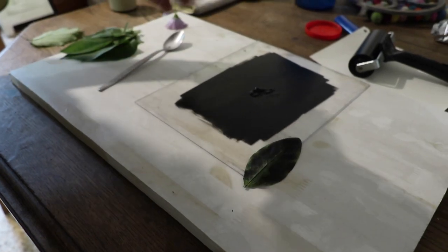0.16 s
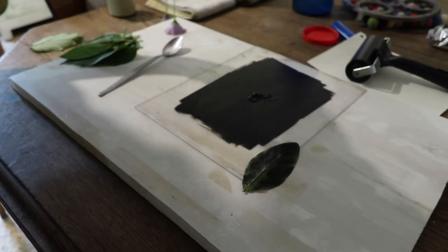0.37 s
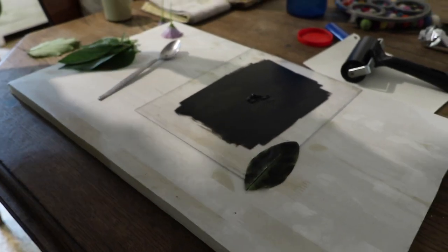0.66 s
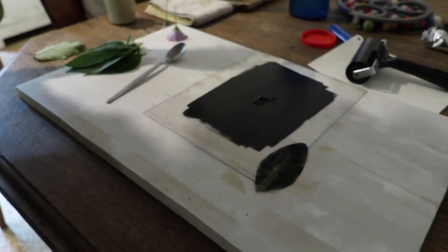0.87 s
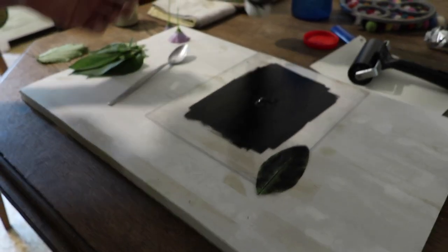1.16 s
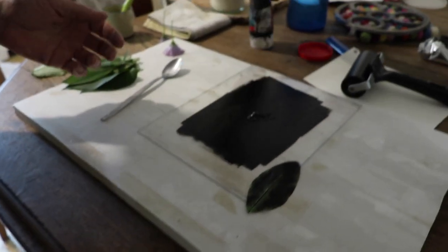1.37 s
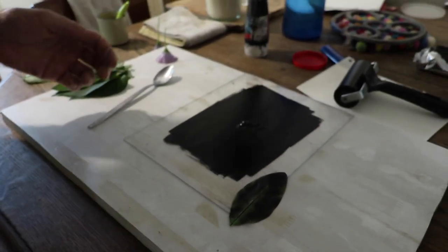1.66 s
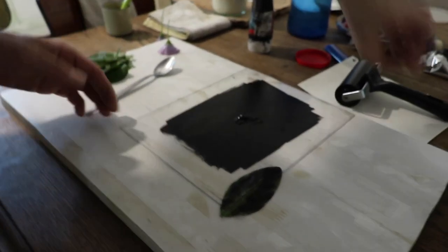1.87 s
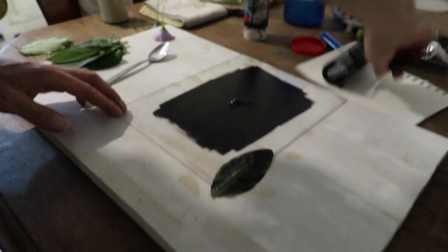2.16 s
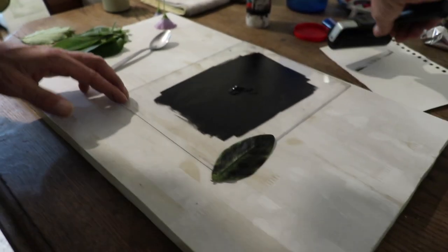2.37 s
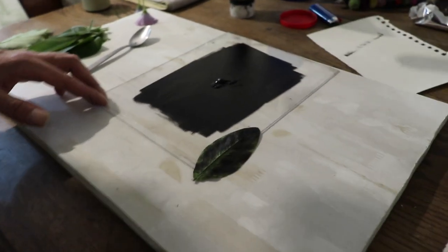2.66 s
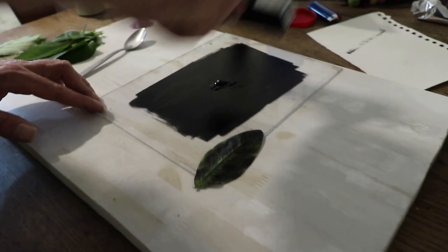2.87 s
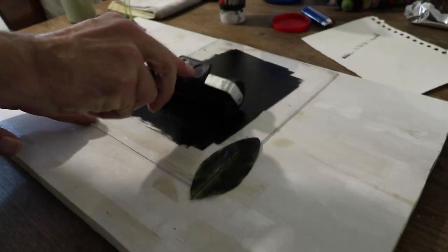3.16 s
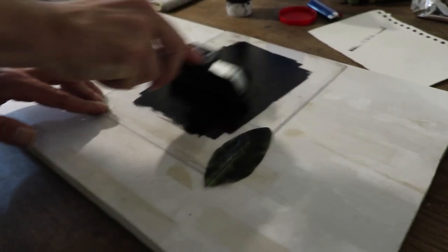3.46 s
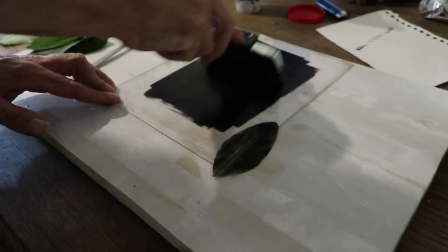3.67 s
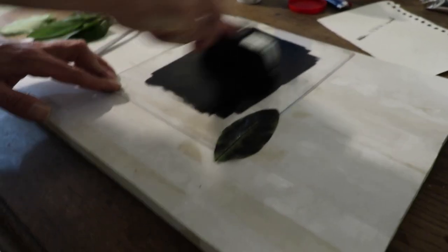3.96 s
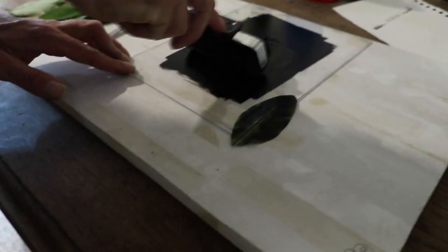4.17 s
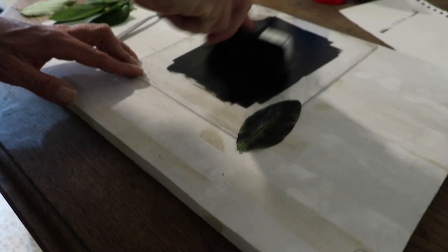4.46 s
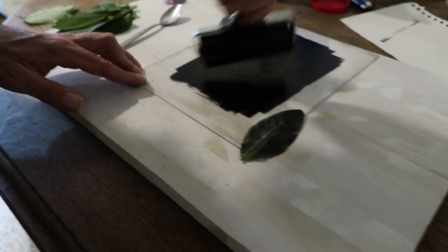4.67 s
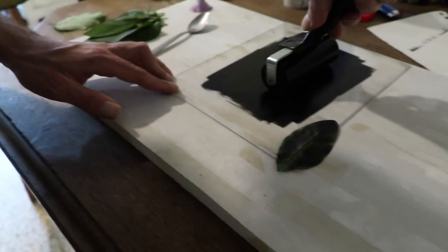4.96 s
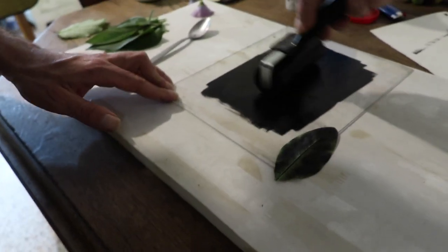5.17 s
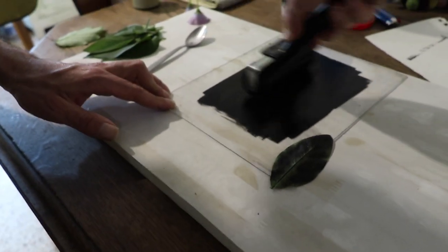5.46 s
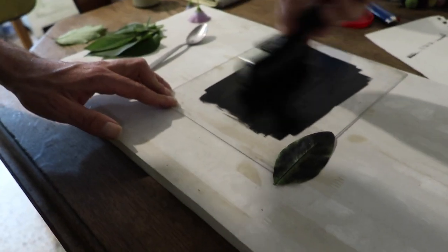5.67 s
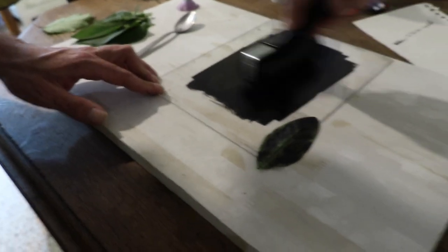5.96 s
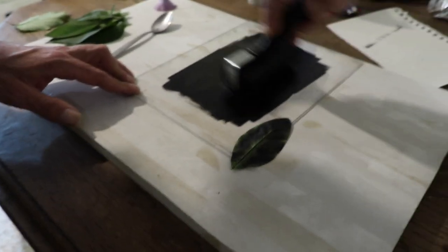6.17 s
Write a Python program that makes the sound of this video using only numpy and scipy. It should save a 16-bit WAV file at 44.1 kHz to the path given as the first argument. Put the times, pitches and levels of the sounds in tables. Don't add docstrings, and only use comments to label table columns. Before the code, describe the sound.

Soft brushing, a spoon clink and a loud knock lead into tacky roller strokes, a clattering set-down on wood, and more sticky rolling.

```python
import sys
import numpy as np
from scipy import signal
from scipy.fft import rfft, irfft, next_fast_len
from scipy.io import wavfile
from scipy.ndimage import uniform_filter1d, map_coordinates

SR = 44100
rng = np.random.default_rng(int(sys.argv[2]) if len(sys.argv) > 2 else 0)


def magnitude_from_level(level_db):
    exponent = np.asarray(level_db, float) / 20
    return 10 ** exponent


def int16_out(signal):
    q = np.round(np.clip(np.atleast_2d(signal).T, -1, 1) * 32767)
    wavfile.write(sys.argv[1], SR, q.astype(np.int16))


N = 279153
T = np.arange(N) / SR


def unit(x):
    return x / np.sqrt(np.mean(x ** 2) + 1e-20)


def along(points, hz):
    f, v = np.transpose(points)
    return np.interp(np.log(hz + 1), np.log(f + 1), v)


def curves(rows):
    s, *cols = np.transpose(rows)
    return [np.interp(T, s, c) for c in cols]


def wobble(rate):
    return map_coordinates(rng.standard_normal(int(N * rate / SR) + 4), [T * rate])


def filtered(x, response):
    m = next_fast_len(N + SR)
    return irfft(rfft(x, m) * response(np.fft.rfftfreq(m, 1 / SR)), m)[..., :N]


def peak(f, hz, width):
    return 1j * f * width / (hz * hz - f * f + 1j * f * width)


def body(modes, damping):
    def response(f):
        total = 0
        for k, (hz, db, t60) in enumerate(modes):
            width = np.log(1000) / np.pi / (damping * t60)
            total = total + (-1) ** k * magnitude_from_level(db) * peak(f, hz, width) * SR / (np.pi * width)
        return total
    return response


def spread(pair, wide):
    mid, side = pair[0], filtered(pair[1], lambda f: 1j * magnitude_from_level(along(wide, f)))
    return np.array([mid + side, mid - side])


def crackle(rate, scatter_db, share):
    hit = rng.random((2, N)) < rate / SR
    size = magnitude_from_level(scatter_db * rng.standard_normal((2, N)))
    grains = hit * size * rng.choice([-1, 1], (2, N))
    return np.sqrt(share) * unit(grains) + np.sqrt(1 - share) * rng.standard_normal((2, N))


def patchy(x):
    z = signal.stft(x, nperseg=256)[2]
    field = uniform_filter1d(rng.standard_normal(z.shape[1:]), size=9, axis=0)
    field = uniform_filter1d(field, size=6, axis=1)
    return unit(signal.istft(z * magnitude_from_level(2.5 * unit(field)), nperseg=256)[1][:, :N])


def strokes(start, length, db, rise, sag, fall):
    u = T[::64] - np.reshape(start, (-1, 1))
    over = np.clip(u - np.reshape(length, (-1, 1)), 0, None)
    fade_db = np.reshape(db, (-1, 1)) - sag * np.clip(u, 0, None) - fall * over
    gain = np.clip(u / rise, 0, 1) * magnitude_from_level(fade_db)
    return np.interp(T, T[::64], np.linalg.norm(gain, axis=0))


def swells(middle, length, db):
    u = 2 * (T[::64] - middle[:, None]) / length[:, None]
    return np.interp(T, T[::64], np.linalg.norm(magnitude_from_level(db[:, None] - 11 * u ** 2), axis=0))


# [f/Hz, level/dB per Hz]
RUB_COLOUR = [(260, 3), (450, 2), (910, 0.5), (1330, -2.5), (1560, -4), (1940, -29.5), (3500, -23),
              (4550, -12.5), (7700, -120)]
# [f/Hz, level/dB per Hz]
TACK_COLOUR = [(1060, -24.5), (1800, 1), (1930, 1), (2560, -0.5), (5840, -5.5), (7500, -10), (9750, -17.5),
               (16500, -120)]
# [f/Hz, level/dB per Hz]
FIZZ_COLOUR = [(3530, -11.5), (6000, -2.5), (13100, -6.5), (15600, -12), (16000, -35.5), (16300, -79.5)]
# [start t/s, length t/s, tack level/dB, shine over tack level/dB, weight level/dB]
PASSES = [(3.267, 0.076, -59, 8, -53), (3.472, 0.033, -50.5, 9, -42), (3.533, 0.077, -49.5, 3, -42.5),
          (3.632, 0.095, -49.5, 7.5, -35.5), (3.82, 0.07, -51, 1, -40.5), (3.87, 0.064, -55.5, 10, -35),
          (3.969, 0.069, -52, 9.5, -39), (4.034, 0.047, -47.5, 4, -35), (4.107, 0.036, -47.5, -6, -45),
          (4.142, 0.044, -48.5, 4, -36), (4.186, 0.064, -48.5, 0, -37), (4.297, 0.052, -50.5, 8.5, -37),
          (4.353, 0.064, -46.5, 2.5, -38), (4.449, 0.14, -48, 0.5, -47), (4.621, 0.038, -47.5, -5, -50),
          (5.368, 0.053, -52, 2, -45), (5.43, 0.069, -55, 4.5, -46), (5.549, 0.099, -53, 8, -40.5),
          (5.68, 0.048, -49, 8.5, -36), (5.745, 0.032, -51, 14.5, -34), (5.843, 0.081, -54, 9, -41.5),
          (5.941, 0.07, -54, 3, -42.5), (6.032, 0.088, -49.5, 6.5, -33.5), (6.176, 0.088, -53, 1.5, -42),
          (6.242, 0.081, -48, 3.5, -41)]
# [middle t/s, length t/s, rub level/dB, rustle level/dB, weight level/dB]
BRUSHES = [(0.064, 0.35, -56.5, -51, -71), (0.32, 0.12, -70, -63.5, -50), (0.42, 0.23, -72, -57.5, -55.5),
           (0.677, 0.1, -78.5, -69, -53), (0.846, 0.23, -51.5, -56.5, -68), (1.068, 0.13, -60.5, -82, -71),
           (1.393, 0.087, -53.5, -46.5, -69.5), (1.984, 0.35, -62.5, -79, -53),
           (2.093, 0.053, -69, -57, -39), (2.17, 0.14, -55, -57.5, -38.5), (2.254, 0.17, -62, -51.5, -48.5),
           (2.57, 0.94, -60, -64.5, -70), (2.922, 0.36, -55.5, -52.5, -50.5), (2.966, 0.065, -72, -57, -47),
           (4.685, 0.09, -47, -64, -46), (4.766, 0.21, -57.5, -57, -62), (4.98, 0.3, -54.5, -55.5, -70),
           (5.35, 0.23, -54, -52, -65), (5.562, 0.069, -58, -58, -37)]
# [f/Hz, side over mid level/dB]
INK_WIDTH = [(60, -34), (110, -72), (200, -40.5), (380, -9), (700, -42.5), (1290, -6.5), (2380, 2),
             (4400, 2), (8120, 3.5), (15000, 6.5)]
PASS_RISE_S, PASS_SAG_DB_PER_S, PASS_FALL_DB_PER_S = 0.0085, 7, 180


def roller():
    s, long, tack_db, shine_db, weight_db = np.transpose(PASSES)
    mid, wide, brush_db, rustle_db, _ = np.transpose(BRUSHES)

    def rolled(db, sag):
        return strokes(s, long, db, PASS_RISE_S, sag, PASS_FALL_DB_PER_S)

    grip_db = tack_db - 1.5 + 0.21 * (weight_db - weight_db.mean())
    rub_gain = np.hypot(rolled(grip_db, PASS_SAG_DB_PER_S), swells(mid, wide, brush_db))
    tear_gain = np.hypot(rolled(tack_db, PASS_SAG_DB_PER_S), swells(mid, wide, rustle_db))
    fizz_gain = np.hypot(rolled(tack_db + shine_db, 31), swells(mid, wide, rustle_db - 8.5))

    rub = crackle(400, 4.9, share=0.44) * magnitude_from_level(1.9 * wobble(40))
    rub = unit(filtered(rub, lambda f: magnitude_from_level(along(RUB_COLOUR, f))))
    tear = crackle(1500, 3.2, share=0.43) * magnitude_from_level(2.0 * wobble(60))
    tear = patchy(filtered(tear, lambda f: magnitude_from_level(along(TACK_COLOUR, f))))
    fizz = crackle(3120, 6.3, share=0.32) * magnitude_from_level(1.8 * wobble(50))
    fizz = patchy(filtered(fizz, lambda f: magnitude_from_level(along(FIZZ_COLOUR, f))))
    ink = magnitude_from_level(2.5) * rub_gain * rub + magnitude_from_level(-1.3) * tear_gain * tear + magnitude_from_level(-6.5) * fizz_gain * fizz
    return spread(wood() + ink, INK_WIDTH)


# [t/s, level/dB]
SHOVES = [(2.13, -52.5), (2.945, -53), (3.56, -50), (3.654, -34.5), (3.9, -44), (3.99, -45), (4.3, -41.5),
          (4.56, -43), (4.665, -37.5), (4.995, -22), (5.4, -43), (5.683, -40), (5.9, -41.5), (6.05, -41.5),
          (6.26, -34)]
# [f/Hz, width f/Hz, level/dB]
BOARD_GRAIN = [(180, 6.6, 8), (231.4, 25, 1), (280, 29, 1), (333, 23, -0.5), (391, 26, -3.5),
               (504, 21, -10.5), (611, 29, -6.5)]


def wood():
    s, long, *_, weight_db = np.transpose(PASSES)
    mid, wide, *_, lean_db = np.transpose(BRUSHES)
    at, shove_db = np.transpose(SHOVES)
    pressed = strokes(s, long, weight_db, 0.043, 0, PASS_FALL_DB_PER_S)
    weight = np.hypot(pressed, swells(mid, wide, lean_db))
    shoved = strokes(at, 0.022, shove_db, PASS_RISE_S, 0, 103)
    hum_gain = np.hypot(np.minimum(magnitude_from_level(-6.5) * shoved, magnitude_from_level(-49)), magnitude_from_level(-8) * weight)

    long_mode = np.sin(2 * np.pi * np.cumsum(145.6 + 1.1 * wobble(3.8)) / SR)
    ring = strokes(at, 0, shove_db, PASS_RISE_S, 0, 58) * long_mode
    ring = ring * np.array([[1], [0]])

    def low_modes(f):
        return peak(f, 145.3, 7.5) + 0.67 * peak(f, 122, 15.0) + 0.19 * peak(f, 108, 40)

    def grain(f):
        bands = sum((-1) ** k * magnitude_from_level(db) * peak(f, hz, width)
                    for k, (hz, width, db) in enumerate(BOARD_GRAIN))
        return peak(f, 290, 520) * bands

    bumps = crackle(120, 3.7, share=0.3) * magnitude_from_level(1.54 * wobble(35))
    hum = unit(filtered(bumps, low_modes))
    rumble = unit(filtered(bumps, grain))
    return ring + magnitude_from_level(-2.5) * hum_gain * hum + magnitude_from_level(-4.0) * weight * rumble


# [t/s, peak level/dB, centre f/Hz, extra side level/dB]
SNAPS = [(2.0737, -42, 6590, 3), (2.2029, -37, 4070, 0), (2.2384, -37, 3870, 0), (3.3079, -28, 2500, 3),
         (3.3518, -27, 4700, -3), (3.482, -24, 8900, 0), (3.4944, -36, 6830, 0), (3.7095, -25.5, 4950, -4),
         (3.7404, -38, 3670, 0), (3.8202, -39, 3690, -2), (3.9704, -31.5, 5500, -6),
         (4.0357, -33, 2940, -5), (4.0554, -32, 6230, 0), (4.0774, -37, 2550, 0), (4.1475, -29, 3580, 1),
         (4.2911, -34, 4370, -2), (4.3316, -31, 7400, -6), (4.361, -27, 6420, -3), (4.3974, -27, 4710, 0),
         (4.4694, -31, 2500, 0), (4.5416, -33.5, 6940, 0), (4.5885, -32, 3860, 0), (5.3764, -36, 5600, 0),
         (5.3911, -24, 5600, 0), (5.4024, -28, 5060, 0), (5.5139, -40, 2600, 0), (5.5598, -27.5, 9040, 0),
         (5.6027, -31, 4880, 0), (5.685, -28, 6330, 2), (5.7154, -26.5, 3320, -2),
         (5.7573, -15.5, 6540, -1), (5.7754, -23, 7400, 1), (5.8596, -37, 3350, 0), (5.9354, -37, 2720, 0),
         (5.9589, -26, 9040, 1.5), (6.0417, -26.5, 3650, -3), (6.0554, -28, 2980, -1)]


def snaps():
    out, t = np.zeros((2, N + SR)), T[:1024]
    f = np.fft.rfftfreq(len(t), 1 / SR)
    for s, db, hz, side_db in SNAPS:
        click = magnitude_from_level(-60 * t / 0.0004) * np.sin(2 * np.pi * 7000 * t)
        click = click + 0.09 * magnitude_from_level(-60 * t / 0.015) * rng.standard_normal(len(t))
        click = irfft(rfft(click) * peak(f, hz, 0.9 * hz) * peak(f, hz, 1.9 * hz))
        level = magnitude_from_level([[db - .6], [db - 3.0 + side_db]])
        out[:, round((s + 0.0006) * SR):][:, :len(t)] += level * click / np.abs(click).max()
    return out[:, :N]


def blows(rows, modes, damping, punch_db, dull_hz, aside_db, leak_db):
    push, crack, t = np.zeros(N), np.zeros((2, N + SR)), T[:4096]
    f = np.fft.rfftfreq(len(t), 1 / SR)
    leak = magnitude_from_level(leak_db) / (1 + 1j * f / 7000 - (f / 7000) ** 2)
    sideways = leak + 1 / (1 + 1.1j * f / dull_hz - (f / dull_hz) ** 2) ** 5
    for s, thud_db, crack_db, hz, width, t60 in rows:
        push[round(s * SR)] += magnitude_from_level(thud_db)
        colour = peak(f, hz, width) * peak(f, hz, 2 * width) / (1 + 1j * f / 7000) ** 2
        first_contact = 3.9 * magnitude_from_level(-60 * t / 0.00016)
        rattle = magnitude_from_level(-60 * t / t60) * (rng.standard_normal(len(t)) + first_contact)
        burst = irfft(rfft(rattle) * colour)
        burst *= magnitude_from_level(crack_db) / np.abs(burst).max()
        even = peak(f, hz, 1.6 * width)
        even = magnitude_from_level(aside_db) * even * np.linalg.norm(burst) / np.linalg.norm(irfft(even))
        crack[:, round(s * SR):][:, :len(t)] += [burst, irfft(even * sideways)]

    def struck(f):
        punch = magnitude_from_level(punch_db) * SR / 300 * peak(f, 220, 160) * peak(f, 266, 390)
        return body(modes, damping)(f) * peak(f, 140, 2500) + punch

    return filtered(push, struck) + crack[:, :N]


# [f/Hz, level/dB, t60 t/s]
BOARD_MODES = [(62, -2, 0.24), (100.4, 1, 0.29), (125, -9.5, 0.2), (181.4, -2, 0.69), (227.6, -2.5, 0.27),
               (299, -5, 0.4), (326, -2, 0.137), (503, -33, 0.17), (649, 2, 0.107)]
# [t/s, peak level/dB, centre f/Hz]
LUMPS = [(3.558, -33, 137), (3.653, -29, 143), (3.703, -30, 151), (3.729, -33, 149), (3.843, -30, 280),
         (3.896, -31.5, 299), (3.939, -37, 180), (3.999, -30.5, 110), (4.192, -27, 183), (4.314, -36, 121),
         (4.379, -31, 339), (4.429, -35, 380), (4.62, -35, 140), (5.394, -31, 131), (5.533, -34.5, 239),
         (5.613, -39, 174), (5.694, -26, 151), (5.719, -25, 180), (6.053, -28.5, 161), (6.089, -30, 176),
         (6.263, -25.5, 137)]


def jolts():
    rows = [(s, db - 32.5, db - 4, hz, 0.51 * hz, .05) for s, db, hz in LUMPS]
    return blows(rows, BOARD_MODES, damping=0.55, punch_db=8, dull_hz=900, aside_db=-1.5, leak_db=-30)


# [f/Hz, level/dB, t60 t/s]
PLATE_MODES = [(80, 1, 0.093), (131, 1.5, 0.28), (171, -28, 0.3), (283.3, -8, 0.78), (342, 1.5, 0.28),
               (525, -1, 0.079), (650, 1, 0.065), (900, 4.5, 0.086)]
# [t/s, thud level/dB, crack level/dB, crack centre f/Hz, crack width f/Hz, t60 t/s]
FIRST_LANDING = [(2.076, -59, -34, 6000, 4960, 0.011), (2.141, -50.5, -34, 1500, 493, 0.026),
                 (2.753, -67, -35.5, 1375, 350, 0.15), (3.186, -56, -26.5, 121, 70.5, 0.062),
                 (3.1865, -70, -36, 1980, 2500, 0.011), (3.2105, -32.5, -16, 1290, 1820, 0.024),
                 (3.2145, -40, -13, 2800, 3400, 0.012), (3.2175, -45, -20, 1210, 1500, 0.016),
                 (3.2235, -36, -20, 3400, 4970, 0.018), (3.229, -45, -21.5, 1500, 2500, 0.018),
                 (3.82, -52.5, -39, 1500, 2530, 0.034)]
SECOND_LANDING = [
    (4.6326, -70, -19.5, 4800, 2200, 0.016),
    (4.667, -47.5, -23, 1500, 2500, 0.02),
    (4.669, -58, -36, 2200, 400, 0.16),
    (4.9855, -58, -21, 500, 596, 0.025),
    (4.99, -80, -20, 84.4, 70, 0.041),
    (4.9895, -38.5, -7, 1120, 1130, 0.025),
    (4.9952, -24.5, -16, 2600, 4000, 0.022),
    (4.9945, -80, -12, 330, 500, .01),
    (6.3086, -71, -23, 3550, 4000, 0.024),
]


def landings():
    first = blows(FIRST_LANDING, PLATE_MODES, damping=0.35, punch_db=-8.5, dull_hz=3000,
                  aside_db=-2.0, leak_db=-9)
    second = blows(SECOND_LANDING, BOARD_MODES, damping=0.56, punch_db=10.5, dull_hz=1500,
                   aside_db=1.5, leak_db=-11)
    return first + second


# [f/Hz, level/dB, t60 t/s]
TABLE_MODES = [(75.2, -8, 3.6), (124.3, -2.5, 0.64), (183, -10, 1.3), (228, -1, 1.1), (283.9, -1, 1.34),
               (325, -14.5, 2.2), (389, -12, 1.2), (635, -20, 1.9), (940, -15.5, 0.55), (1283, -7, 0.38),
               (1410, -6, 0.3), (1970, -18.5, .3), (2330, -16, .3), (2643, -22, .3)]
# [t/s, thud level/dB, crack level/dB, crack centre f/Hz, crack width f/Hz, t60 t/s]
TUBE_BLOWS = [
    (.797, -56, -33.5, 503, 900, 0.051),
    (.7965, -81, -35, 5000, 8000, 0.03),
    (1.349, -59.5, -32, 2500, 3000, 0.02),
    (1.352, -59.5, -35, 388, 60, 0.42),
    (1.395, -71, -23, 2000, 2500, 0.057),
    (1.3997, -61.5, 1.5, 1890, 800, 0.015),
    (1.401, -77.5, -21, 3450, 300, 0.08),
    (1.402, -20.5, -23.5, 3130, 1380, 0.0076),
]


def tube():
    return blows(TUBE_BLOWS, TABLE_MODES, damping=0.29, punch_db=17.5, dull_hz=4300,
                 aside_db=-8.5, leak_db=-30.5)


# [t/s, thud level/dB, crack level/dB, crack centre f/Hz, crack width f/Hz, t60 t/s]
CAP_CLICKS = [
    (1.1619, -78.5, -16, 5350, 7000, 0.011),
    (1.1625, -85, -31, 3600, 500, 0.033),
    (1.163, -83, -31.5, 780, 900, 0.063),
    (1.1772, -88, -30.5, 3500, 3000, 0.012),
]


def cap():
    return blows(CAP_CLICKS, BOARD_MODES, damping=0.54, punch_db=2.5, dull_hz=6000,
                 aside_db=7.0, leak_db=-25)


# [f/Hz, level/dB, t60 t/s]
SPOON_MODES = [(1500, -17, 0.063), (1724, -1, 0.019), (1780, -8.5, 0.017), (2200, -22.5, 0.019),
               (3550, -8, 0.031), (3540, -20, 0.024), (6500, -19.5, 0.04), (6620, -15.5, 0.022),
               (8500, -21, 0.035), (9100, -11, 0.014), (10830, -27, 0.038)]
# [t/s, level/dB]
CLINK = (.7962, -18.5)


def spoon():
    out, t = np.zeros(N), T[:SR // 3]
    ring = np.zeros(len(t))
    for hz, db, t60 in SPOON_MODES:
        drift = .09 * np.cumsum(rng.standard_normal(len(t)))
        ring += magnitude_from_level(db - 60 * t / t60) * np.sin(2 * np.pi * hz * t + drift)
    onset = 1 - np.exp(-t / 0.00049)
    out[round(CLINK[0] * SR):][:len(t)] = magnitude_from_level(CLINK[1] + 1.0) * onset * ring
    return out


# [t/s, f/Hz, level/dB]
CREAK = [
    (.3, 300, -85),
    (.36, 306.3, -60),
    (.45, 313.3, -56.5),
    (.56, 307, -48.5),
    (.62, 310, -52.5),
    (.68, 312, -80),
]


def creak():
    hz, db = curves(CREAK)
    turn = 2 * np.pi * np.cumsum(hz) / SR
    return magnitude_from_level(db - 1.0 + 1.3 * wobble(28)) * (np.sin(turn) + magnitude_from_level(-6) * np.sin(2 * turn))


# [t/s, level/dB]
PEEL = [
    (2.17, -94.5),
    (2.21, -59),
    (2.27, -41.5),
    (2.32, -52),
    (2.39, -53.5),
    (2.45, -63),
]


def paper():
    peel = unit(filtered(crackle(1200, 6.1, share=.35), lambda f: peak(f, 5100, 3900) ** 2))
    return magnitude_from_level(curves(PEEL)[0]) * peel * magnitude_from_level([[-3], [1.5]])


# [f/Hz, t60 t/s]
WALLS = [(60, 0.73), (300, 0.59), (1500, 0.55), (3500, 0.44), (5500, 0.56), (12000, 0.35)]


def reverb(x, at):
    out = np.zeros((2, N))
    for a, b in zip(at, at[1:] + [N]):
        hz, t, z = signal.stft(rng.standard_normal((2, SR)), SR, nperseg=512)
        decay = magnitude_from_level(-60 * t / along(WALLS, hz)[:, None])
        tail = signal.istft(z * decay, SR, nperseg=512)[1]
        late = np.pad(x[a:b], (260, 0))[None]
        wet = signal.fftconvolve(late, tail / np.linalg.norm(tail[0]), axes=1)
        out[:, a:a + wet.shape[1]] += wet[:, :N - a]
    return out


# [t/s, level/dB]
AIR_LEVEL = [
    (0, -53),
    (1.38, -54),
    (1.5, -60.5),
    (1.95, -58),
    (2.4, -53),
    (3.4, -53.5),
    (6.33, -52),
]
# [f/Hz, level/dB per Hz]
AIR_COLOUR = [(35, -35.5), (60, -8.5), (124, -8), (181, -6.5), (263, -6.5), (310, -9), (348, -10),
              (611, -13.5), (773, -15), (2500, -19.5), (10900, -35), (16300, -45)]
# [f/Hz, side over mid level/dB]
AIR_WIDTH = [(60, -28.5), (110, -10.5), (200, -5), (380, 2.5), (700, 0.5), (1290, 2), (2380, 3), (4400, 5),
             (8120, 2), (15000, 4.5)]
# [t/s, level/dB]
SHAKES = [
    (1.2, -59),
    (1.4, -38.5),
    (3.2, -49),
    (4.26, -57),
    (4.95, -57),
    (6.1, -45),
]


def room_tone():
    air = unit(filtered(rng.standard_normal((2, N)), lambda f: magnitude_from_level(along(AIR_COLOUR, f))))
    deep = unit(filtered(rng.standard_normal(N), lambda f: peak(f, 38.7, 22) ** 2))
    at, shake_db = np.transpose(SHAKES)
    shaken = strokes(at, 0.064, shake_db, 0.064, 0, 58)
    deep_gain = np.hypot(magnitude_from_level(-62 + 2.5 * wobble(5)), shaken)
    air_gain = magnitude_from_level(curves(AIR_LEVEL)[0] + 0.61 * wobble(5.85))
    return spread(air_gain * air, AIR_WIDTH) + magnitude_from_level(-2.5) * deep_gain * deep


# [f/Hz, side over mid level/dB]
HIT_WIDTH = [(60, -34), (110, -70.5), (200, -20.5), (380, -11.5), (700, -10), (1290, -1), (2380, 0),
             (4400, -1), (8120, 5.5), (15000, 2.5)]


def scene():
    bang, landed, shut = tube(), landings() + jolts(), cap()
    steel, threads = spoon(), snaps()
    send = magnitude_from_level(-3.0) * bang[1] + magnitude_from_level(-5.0) * landed[1] + magnitude_from_level(-7.5) * steel
    send = send + magnitude_from_level(-27.5) * shut[1] + magnitude_from_level(-12.5) * threads[0]
    wet = reverb(send, [round(s * SR) for s in (0, 1.1, 1.9, 3.1, 4.5, 4.9, 5.5)])
    hits = bang[0] + landed[0] + steel + creak() + wet * magnitude_from_level([[-.5], [-1.5]])
    close = shut[0] * magnitude_from_level([[-.5], [1.5]]) + threads + paper()
    return spread(hits, HIT_WIDTH) + spread(close, INK_WIDTH) + roller() + room_tone()


def band_limit(x):
    return signal.sosfilt(signal.butter(12, 16440, fs=SR, output="sos"), x)


def record(dry):
    clipped = dry / (1 + np.abs(dry / .97) ** 8) ** (1 / 8)
    mix = filtered(clipped, lambda f: np.clip((16500 - f) / 500, 0, 1))
    return band_limit(mix)


dry = scene()
out = record(dry)
int16_out(out)
```